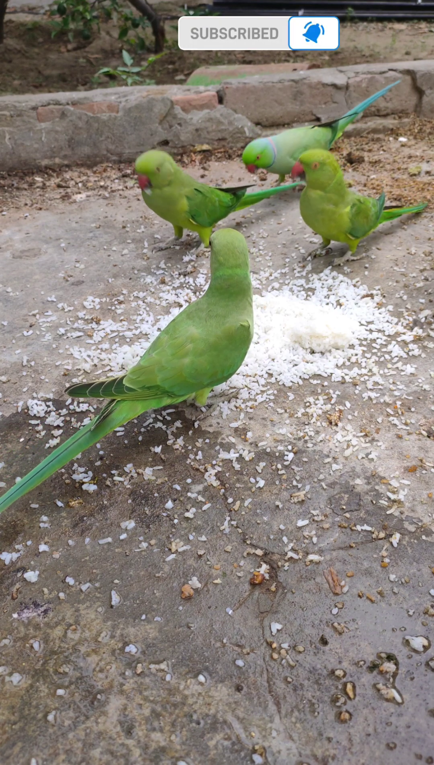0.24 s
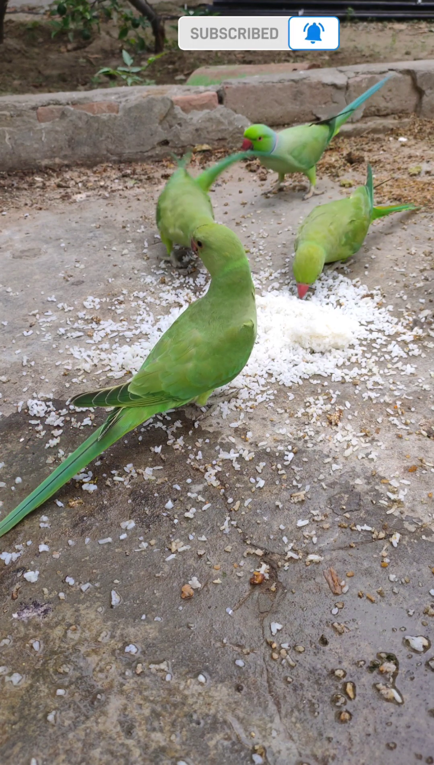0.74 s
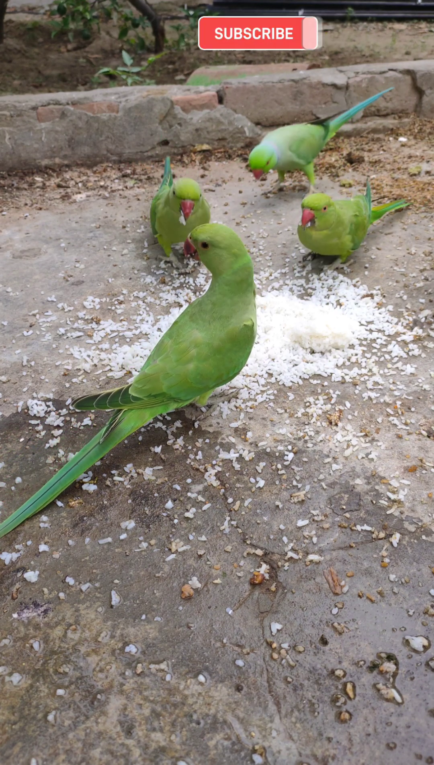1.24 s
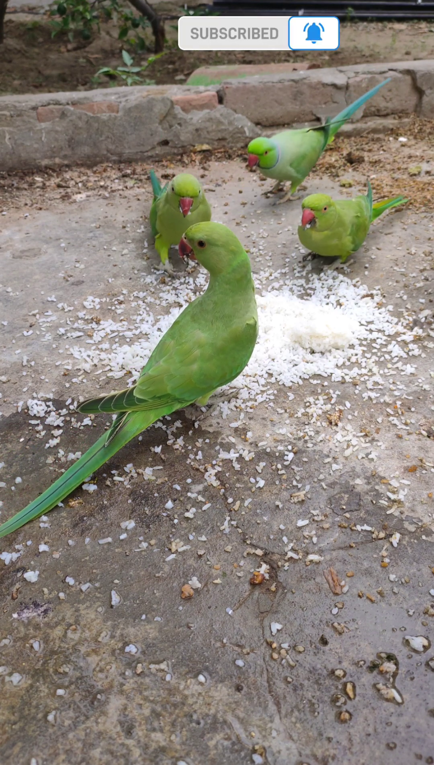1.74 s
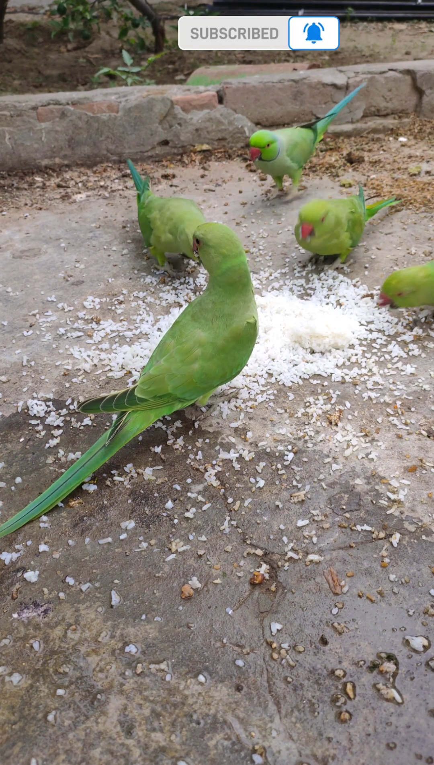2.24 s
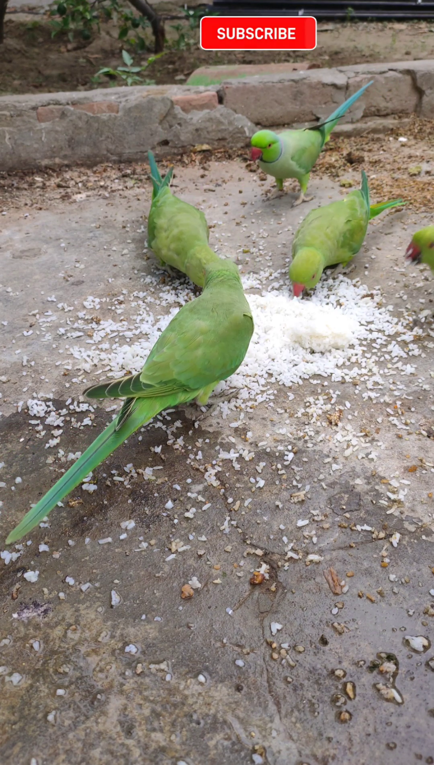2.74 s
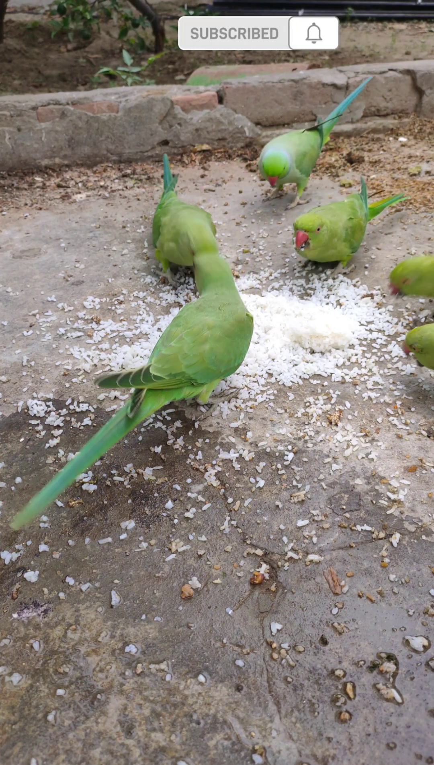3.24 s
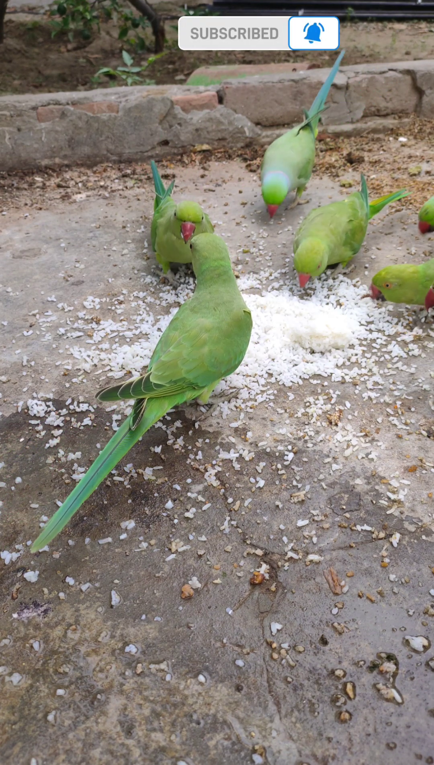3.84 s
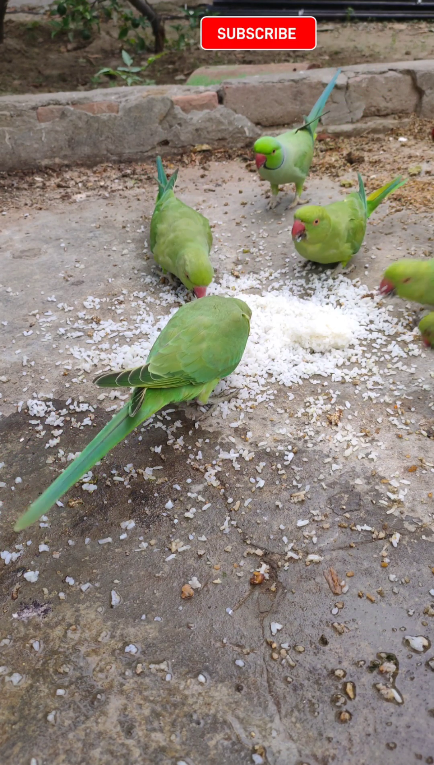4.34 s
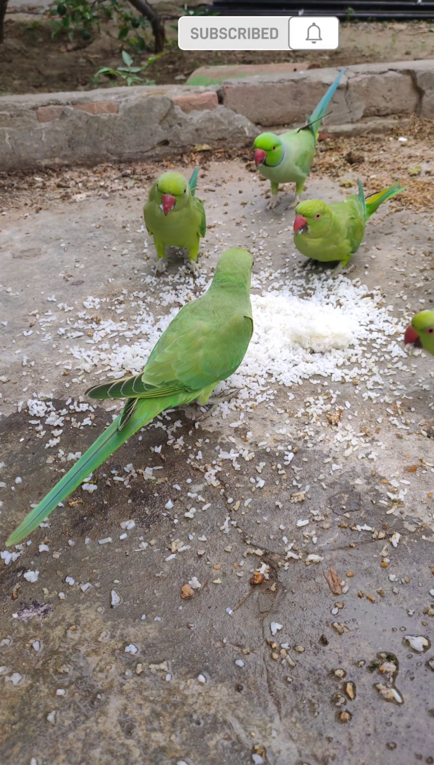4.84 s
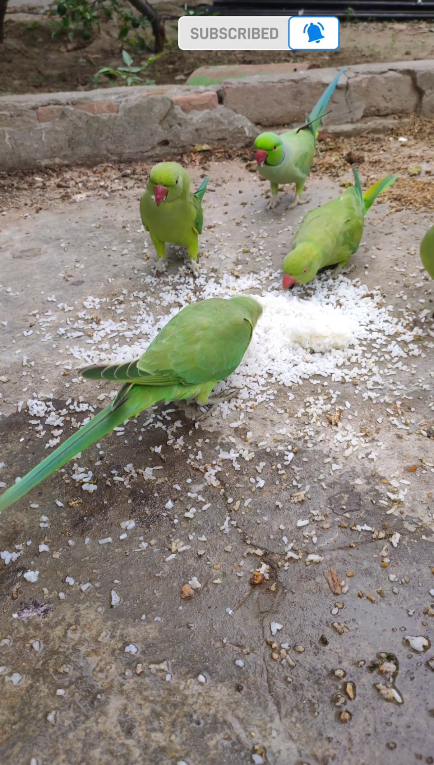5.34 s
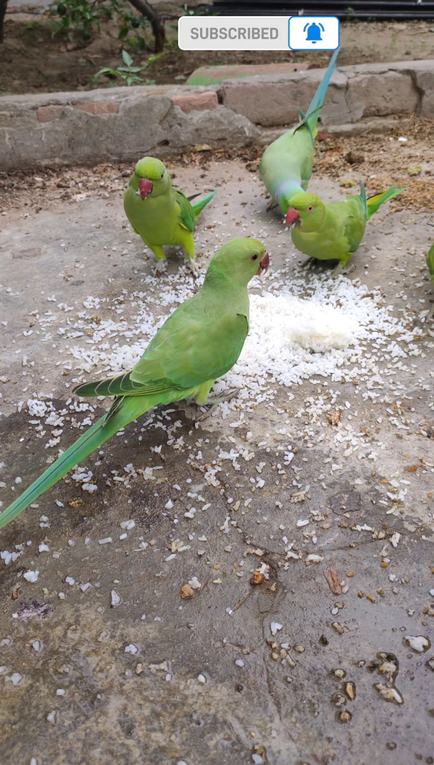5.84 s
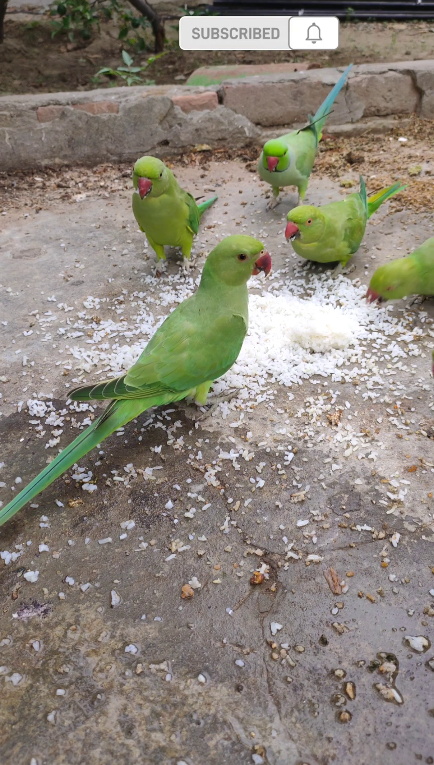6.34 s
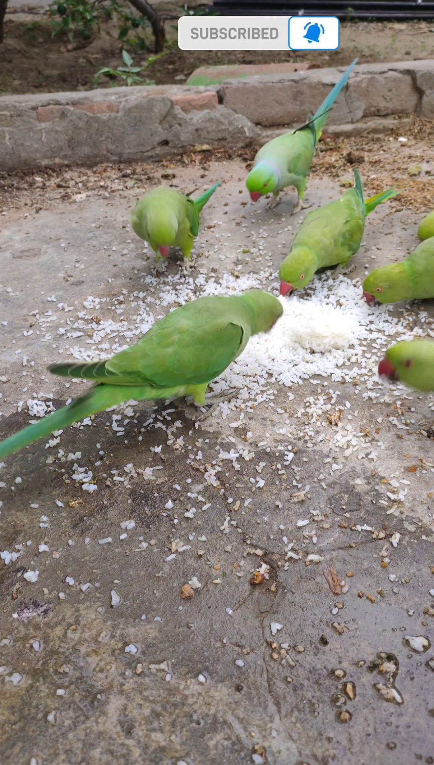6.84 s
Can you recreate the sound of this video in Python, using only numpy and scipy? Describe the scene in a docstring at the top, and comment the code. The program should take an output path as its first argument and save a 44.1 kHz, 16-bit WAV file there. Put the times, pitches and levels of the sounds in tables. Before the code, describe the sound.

A sharp parakeet shriek bursts close by, then screeches, clear plunging whistles and nasal yelps echo around a quiet walled yard with faint grain rustle.

```python
"""A walled yard where parakeets feed on the ground: one shrieks close by, others screech, yelp, whistle, whine
and croak around it. Each call is a sum of harmonics, half-harmonics and hiss shaped by a throat spectrum.
Faint twitters come from farther off; beaks tick, grain rustles and wings flap, as shaped noise and short
falling tones, and a soft bright hiss swells unevenly. The walls return the calls as echoes and a diffuse tail,
over a low outdoor wash, two distant hums and air that buffets the microphone."""
import sys
import numpy as np
from scipy import signal
from scipy.fft import rfft, irfft, next_fast_len
from scipy.io import wavfile
from scipy.ndimage import uniform_filter1d

SR = 44100
rng = np.random.default_rng(int(sys.argv[2]) if len(sys.argv) > 2 else 0)


def waveform_to_disk(signal):
    """Save audio, clipped to [-1, 1], as 16-bit WAV at the path in sys.argv[1]."""
    frames = np.transpose(np.atleast_2d(signal))
    scaled = np.clip(frames, -1, 1) * 32767
    samples = np.round(scaled).astype(np.int16)
    wavfile.write(sys.argv[1], SR, samples)


N = 312228
TIME = np.arange(N) / SR
EDGE_HZ = 15400  # upper band limit

# Course of the sharp shriek next to the microphone: [t/s, f/Hz, level/dB]
SHRIEK_COURSE = [(0, 2164, -17.5), (.008, 2198, -20), (.012, 2515, -26.5), (.018, 2665, -30.5),
                 (.023, 2323, -25), (.027, 1745, -28.5), (.031, 1426, -29.5), (.036, 1328, -36.5),
                 (.043, 1250, -48.5)]
# Harsh arched screeches: [start t/s, length t/s, top f/Hz, share of length spent rising, level/dB]
SCREECH_NOTES = [(0.27, 0.082, 2497, 0.29, -53), (0.456, .106, 2430, .27, -46),
                 (0.664, 0.1, 2278, 0.16, -43.5), (2.727, 0.17, 2090, 0.19, -66),
                 (2.957, 0.12, 2310, 0.2, -64), (3.202, .115, 2370, .27, -66.5),
                 (3.44, 0.13, 2550, .25, -65.5)]
# Nearly pure whistles that end in a plunge:
# [start t/s, hold t/s, plunge t/s, opening f/Hz, settled f/Hz, crest f/Hz, level/dB, swell/dB]
WHISTLE_NOTES = [ (0.555, 0.071, 0.043, 2097, 2137, 2247, -38.5, 12.5),
                 (2.334, 0.12, 0.058, 2393, 2426, 2426, -34.5, 19.5),
                 (2.809, .069, .052, 2095, 2180, 2364, -39.5, 17.5),
                 (3.062, .069, 0.023, 2533, 2359, 2675, -35, 15),
                 (3.269, 0.068, 0.047, 2640, 2476, 2486, -33, 19),
                 (3.475, 0.08, 0.043, 2616, 2442, 2491, -31.5, 20.5),
                 (3.681, .053, .05, 2850, 2690, 2584, -30, 17.5),
                 (3.853, 0.056, 0.058, 3187, 2820, 2743, -30.5, 19.5),
                 (6.703, .047, .012, 2412, 2540, 2665, -33, 9.5)]
# Whines with more overtones:
# [start t/s, length t/s, opening f/Hz, turning f/Hz, closing f/Hz, share before the turn, level/dB, swell/dB]
WHINE_NOTES = [(5.25, .165, 1311, 1231, 1280, 0.647, -50.5, 7.5),
               (6.484, .117, 2290, 2256, 2639, 0.142, -34, 11.5)]
# Nasal yelps, bending through a turning pitch: columns as for the whines
YELP_NOTES = [ (.456, 0.014, 2260, 2110, 2180, 0.6, -44.5, 14),
              (2.004, 0.063, 2008, 1790, 1990, 0.63, -39.5, 6.2),
              (2.167, 0.11, 1943, 1924, 2460, 0.3, -37.5, 1.6),
              (2.632, 0.067, 2150, 1871, 2224, .42, -41.5, 2),
              (5.662, 0.073, 2198, 2018, 2106, 0.45, -42.5, 3.4),
              (5.829, .062, 2050, 1985, 2125, 0.514, -40.5, 5.6),
              (6.297, .077, 1668, 1768, 1828, 0.46, -39, 8.4),
              (6.686, .011, 2260, 2178, 2280, 0.44, -48.5, 3.6),
              (6.917, 0.023, 2580, 2070, 2060, .65, -43.5, 5.9),
              (6.954, 0.048, 2054, 2008, 2498, 0.29, -39.5, 10.4)]
# Low falling chucks of another bird: [start t/s, length t/s, closing f/Hz, level/dB]
CHUCK_NOTES = [(1.613, .042, 526, -49.5), (1.813, .043, 519.7, -49), (2.006, 0.027, 501, -51.5)]
# Rasping croaks, alone or where a call breaks off: [start t/s, length t/s, closing f/Hz, level/dB]
CROAK_NOTES = [(5.99, .112, 1436, -56.5), (6.152, .076, 1420, -57.5), (6.598, 0.034, 1984, -62.5),
               (6.754, 0.041, 1438, -59.5)]
# Course of a hoarse rising squawk: [t/s, f/Hz, level/dB]
SQUAWK_COURSE = [(5.405, 1324, -59), (5.44, 1660, -45), (5.48, 1858, -49), (5.515, 2050, -44.5),
                 (5.535, 2430, -59)]
# Soft slides: faint twitters and the rising lead-in of a screech:
# [start t/s, length t/s, opening f/Hz, closing f/Hz, level/dB]
SOFT_SLIDES = [ (0.212, 0.057, 2235, 3730, -54), (0.972, 0.031, 2490, 2434, -68),
               (1.296, .125, 3360, 2400, -69), (1.618, 0.036, 2646, 2390, -61),
               (1.825, 0.043, 2820, 2360, -57), (3.876, 0.13, 1130, 1500, -60.5),
               (4.12, 0.11, 2543, 2680, -66), (4.421, .135, 2316, 2750, -67),
               (4.755, 0.17, 2180, 2790, -66), (5.02, 0.056, 2000, 2020, -75),
               (5.107, .24, 2848, 3057, -70.5), (6.45, 0.032, 2880, 2484, -46.5)]

# Throat spectra, one for each kind of call: [f/Hz, relative level/dB]
SHRIEK_SPECTRUM = [(1300, -17), (2400, -13.5), (4400, 3), (5300, -10.5), (6600, -20.5), (8800, -10),
                   (11000, -12.5), (13000, -13), (15500, -31.5)]
SCREECH_SPECTRUM = [(1500, -36), (2300, 4), (3400, 11), (4600, 2.5), (6000, 10.5), (7500, 2), (9300, 0.5),
                    (11000, -29), (15000, -27)]
WHISTLE_SPECTRUM = [(1100, 0), (2700, 0), (3500, -16), (5000, -22), (7500, -30), (10000, -42), (15000, -50)]
WHINE_SPECTRUM = [(1200, 25.5), (2400, 6.5), (3500, 3), (4700, -15), (7200, -34.5), (9500, -42),
                  (15000, -43)]  # shared by the soft slides
YELP_SPECTRUM = [(1700, -3.5), (1930, -4), (2200, 12.5), (2900, -1), (3600, 3), (3900, -1), (4200, -4),
                 (5700, -21), (7600, -27), (10000, -33.5), (15000, -42)]
SQUAWK_SPECTRUM = [(1200, -7), (2200, 2.5), (2800, -20), (3500, -6.5), (4300, -57), (9000, -36),
                   (15000, -36)]
CHUCK_SPECTRUM = [(480, 6.5), (700, 2.5), (1200, 6), (1700, -4.5), (2500, -37.5), (3300, -21), (5000, -23),
                  (9000, -30), (15000, -27)]
CROAK_SPECTRUM = [(1100, -1), (1500, -1.5), (2300, -3), (3200, -19), (6000, -34), (15000, -29)]

# Beak ticks: [t/s, peak level/dB]
BEAK_TICKS = [(0.148, -46.5), (0.426, -54), (0.443, -45.5), (1.394, -54), (1.45, -42.5), (3.508, -41.5),
              (3.523, -36)]
# Soft wing beats and bumps: [t/s, level/dB, f/Hz, half-length t/s, left-right difference/dB]
WING_PUFFS = [(.008, -37.5, 207, 0.017, 17), (.014, -47, 605, 0.017, 6.5), (0.03, -39.5, 260, .02, 13),
              (0.235, -37, 120, .017, 6), (.26, -47, 255, .014, 4), (0.312, -39, 90.5, .021, -9),
              (.429, -51, 1130, 0.0067, 5), (5.448, -55, 367, 0.035, 5), (5.554, -51.5, 278, 0.035, 4),
              (5.631, -51.5, 412, 0.027, 3), (5.732, -54, 326, 0.032, 3), (5.822, -55, 333, 0.032, 2),
              (5.908, -52, 468, 0.017, 4), (6.125, -43.5, 145, .02, -17), (6.246, -43.5, 115, 0.0427, 15),
              (6.319, -29.5, 134, 0.0093, -30), (6.545, -42, 130, .025, 24), (6.631, -41, 84.5, 0.037, -15)]
# Scuffles in the grain: [start t/s, length t/s, level/dB]
GRAIN_SCUFFLES = [(0, 0.022, -49.5), (2.428, 0.14, -54), (2.595, 0.24, -62.5), (2.965, 0.14, -65.5),
                  (3.206, 0.11, -66), (3.478, 0.087, -69), (5.347, 0.55, -65.5)]
# Soft bright hiss, partly around the whistles: [start t/s, length t/s, level/dB]
BRIGHT_HISS = [(3.31, 0.053, -75), (3.49, 0.069, -65), (3.7, .06, -72.5), (3.873, 0.076, -73),
               (4.49, 0.71, -81.5), (5.178, 0.65, -77)]
# Gusts on the microphone: [peak t/s, width t/s, level/dB]
AIR_GUSTS = [(.01, 0.063, -46.5), (.27, 0.18, -50), (1.1, .3, -71.5), (3.9, 0.36, -72), (3.15, 0.29, -62.5),
             (4.6, 0.56, -66.5), (5.5, 0.597, -60.5), (6.25, 0.26, -47), (6.599, 0.089, -60),
             (6.95, 0.54, -56.5)]
# Two distant hums: [start t/s, fade-in t/s, f/Hz, level/dB]
DISTANT_HUMS = [(4.4, 0.3, 73.27, -60.5), (6.54, .06, 304.4, -66.5)]

# Noise spectra of ticks and bright hiss, rustling grain, buffeting air and outdoor wash:
# [f/Hz, relative level/dB]
BRIGHT_SPECTRUM = [(500, -25), (3000, -12), (8000, -6.5), (13000, 2.5), (15500, -6)]
RUSTLE_SPECTRUM = [(800, -5.5), (2000, 4.5), (4000, 3), (5500, -2), (7400, 1), (9500, -4), (11500, -16),
                   (15000, -23.5)]
BUFFET_SPECTRUM = [(20, -20.5), (45, -4.5), (70, 8.5), (110, 0), (160, -7.5), (230, -16), (350, -23.5),
                   (700, -41), (2000, -63)]
WASH_SPECTRUM = [(15, -22), (40, -2), (75, 0.05), (125, -5), (200, -9), (270, -15), (400, -15), (560, -13),
                 (800, -16), (2400, -18), (4000, -27), (7000, -28), (10000, -32), (15000, -34)]
# Left-right coherence of the noises: [f/Hz, coherence 0-1]
COHERENCE = [(60, .4), (200, .4), (550, .65), (2000, .55), (5000, .25), (15000, .2)]

# Wall echoes: [left delay t/s, right delay t/s, level/dB before each call's own wall gain]
WALL_ECHOES = [(0.011, 0.0115, -3.5), (0.021, 0.011, -8.5), (0.045, 0.0385, -11), (0.054, 0.032, -18.5),
               (.078, .08, -24.5)]
# Decay of the diffuse tail: [f/Hz, time to fall 60 dB t/s]
TAIL_DECAY = [(300, 0.45), (1500, 0.7), (2600, 0.37), (5000, 0.56), (9000, 0.39), (15000, 0.87)]
# Far walls that return the shriek: [delay t/s, level/dB]
FAR_WALL_ECHOES = [(.052, -37), (0.065, -44), (.075, -36), (.087, -31), (.108, -32)]
# Shading between the microphones by the recorder's body, for a bird so close: [f/Hz, left-right difference/dB]
NEAR_SHADING = [(1500, 7), (2500, 10), (4400, 16), (6500, 4.5), (8800, -7), (10700, -13), (13000, 13)]

FAR_WALL_HZ = 5600  # the far walls give back little above this
WASH_DB = -62.5
SCREECH_OPENS, SCREECH_CLOSES = 0.62, 0.66  # pitch at either end, as a share of the top
WHISTLE_SETTLES, WHISTLE_CRESTS = 0.365, 0.822  # shares of the hold
KNEE, PLUNGE_TO = 0.98, 0.48  # pitch at the start and end of the plunge, as a share of the crest pitch
BREAK_HZ_SHARE, BREAK_DB = 0.044, 4.5  # how far pitch and level shake as a whistle collapses
STRAIN_HZ_SHARE, STRAIN_DB = 0.034, 3.5  # the same at the strained end of a yelp or whine
SCUFFLE_ATTACK_S, SCUFFLE_RELEASE_S = 0.016, 0.051
FEEDING_FROM_S, FEEDING_TO_S = 1.2, 6.8
FEEDING_DB, FIDGET_DB = -73, -3  # level of the steady stir and its unevenness


def gain_of(db):
    """Decibel law: level to amplitude ratio."""
    return 10 ** (np.asarray(db) / 20)


def evened(x):
    """Normalization: scales to rms 1."""
    return x / np.sqrt(np.mean(x ** 2) + 1e-20)


def read(points, hz):
    """Interpolation of a spectrum on a log-frequency axis."""
    f, value = np.transpose(points)
    return np.interp(np.log(hz + 1), np.log(f + 1), value)


def add(mix, s, sound):
    """Superposition: adds a sound to the mix at time s."""
    part = mix[..., max(round(s * SR), 0):][..., :sound.shape[-1]]
    part += sound[..., :part.shape[-1]]


def wander(n, hz):
    """Low-pass random drift of rms near 1, mostly slower than about hz."""
    size = next_fast_len(n + 2048)
    f = np.fft.rfftfreq(size, 1 / SR)
    spectrum = rfft(rng.standard_normal(size)) * np.exp(-(f / hz) ** 2)
    return evened(irfft(spectrum, size))[:n]


def shake(u):
    """Quick random unsteadiness of rms 1 over the course of a call."""
    return evened(uniform_filter1d(rng.standard_normal(len(u)), size=3))


def progress(count=60):
    """Normalized time: the course of a call from 0 to 1."""
    return np.arange(count) / (count - 1)


def arc(u, turn, opening, middle, closing, curve):
    """Power-law contour: eases from opening to middle at the turn, then away to closing; u runs 0-1."""
    before = np.clip(1 - u / turn, 0, 1)
    after = np.clip((u - turn) / (1 - turn), 0, 1)
    return middle + (opening - middle) * before ** curve + (closing - middle) * after ** curve


def burst(start, length, attack_s, release_s):
    """Envelope: linear attack, hold and exponential release."""
    attack = np.clip((TIME - start) / attack_s, 0, 1)
    return attack * np.exp(-np.maximum(TIME - start - length, 0) / release_s)


def sides(balance_db):
    """Intensity stereophony: left and right gains for a level difference, at constant power."""
    return evened(gain_of(np.array([[balance_db], [-balance_db]]) / 2))


def delayed_right(spectrum, lag_s):
    """Phase shift theorem: two copies of a spectrum, the right one later by lag_s."""
    hz = np.fft.rfftfreq(N, 1 / SR)
    return spectrum * np.exp(-2j * np.pi * np.outer([0, lag_s], hz))


def aside(x, balance_db, lag_s):
    """Level and time difference: an off-centre source differs in loudness and arrival between the sides."""
    return sides(balance_db) * irfft(delayed_right(rfft(x), lag_s), N)


def noise(spectrum, patchy_db):
    """Partial coherence: stereo noise of rms 1 with a given spectrum and drifting patches."""
    frames, hz = N // 256 + 6, np.fft.rfftfreq(1024, 1 / SR)
    a, b, c, d, patches = rng.standard_normal((5, frames, len(hz))).transpose(0, 2, 1)
    patches = uniform_filter1d(patches, size=12, axis=0)
    patches = evened(uniform_filter1d(patches, size=12, axis=1))
    same = read(COHERENCE, hz)[:, None]
    left, independent = a + 1j * b, c + 1j * d
    right = same * left + np.sqrt(1 - same ** 2) * independent
    z = np.array([left, right]) * gain_of(read(spectrum, hz)[:, None] + patchy_db * patches)
    return evened(signal.istft(z, nperseg=1024, noverlap=768)[1][:, :N])


def yard(x, walls_db, tail_db):
    """Reverberation: a few wall echoes, and a diffuse tail in which each band dies at its own speed."""
    t = np.arange(SR) / SR
    taps = rng.standard_normal((2, SR)) * (rng.random((2, SR)) < 0.08)  # sparse reflections
    taps *= np.clip((t - 0.006) / 0.013, 0, 1)
    hz, at, z = signal.stft(taps, SR, nperseg=256)
    decay = gain_of(-60 * at / read(TAIL_DECAY, hz)[:, None])
    response = signal.istft(z * decay, SR, nperseg=256)[1]
    response *= gain_of(tail_db) / np.linalg.norm(response, axis=1, keepdims=True)
    for left, right, db in WALL_ECHOES:
        response[[0, 1], [round(left * SR), round(right * SR)]] += gain_of(db + walls_db)
    return signal.fftconvolve(x[None], response, axes=1)[:, :N]


def syrinx(calls, throat, jitter, jitter_hz, flutter, half_db, hiss_db, overtone_db=0):
    """Source and filter: a jittering membrane's harmonics, half-harmonics from uneven cycles and air hiss
    pass the throat; each call is rows [t/s, f/Hz, level/dB]."""
    out = np.zeros(N)
    for rows in calls:
        s, pitch, level = np.transpose(rows)
        t = np.arange(s.min(), s.max() + 0.0051, 1 / SR)
        hz = uniform_filter1d(np.interp(t, s, pitch), size=300, mode="nearest")
        turns = np.cumsum(hz * (1 + jitter * wander(len(t), jitter_hz))) / SR + rng.random()
        # multiples of the pitch in steps of a half, starting at 1
        multiple = np.arange(2, min(2 * EDGE_HZ // hz.min(), 30))[:, None] / 2
        partial_hz = multiple * hz
        height = gain_of(read(throat, partial_hz) + half_db * (multiple % 1 > 0))
        height = height * (partial_hz < SR / 2)
        height = height * gain_of(overtone_db * (multiple > 1))  # a gently driven membrane is nearly a sine
        # overtones sound less steadily the higher they lie, up to a limit
        flicker = evened(uniform_filter1d(rng.standard_normal(height.shape), size=350))
        height = height * gain_of(np.minimum(multiple - 1, 3) * 1.42 * flicker)
        tone = (height * np.sin(2 * np.pi * multiple * turns)).sum(0)
        tone /= np.sqrt((height ** 2).sum(0) / 2)
        f = np.fft.rfftfreq(len(t), 1 / SR)
        hiss_gain = gain_of(read(throat, f)) * (f > 0.7 * hz.min())
        hiss = evened(irfft(rfft(rng.standard_normal(len(t))) * hiss_gain, len(t)))
        edges = np.clip(np.minimum(t - t[0], t[-1] - t) / 0.0015, 0, 1)
        effort = edges * gain_of(np.interp(t, s, level)) * np.exp(flutter * wander(len(t), jitter_hz))
        add(out, t[0], (tone + gain_of(hiss_db) * hiss) * effort)
    return out


def bending(rows, curve, crest, fade_db):
    """Pitch glide: notes bend through one turning pitch, swell to a crest and roughen at the end."""
    u, calls = progress(), []
    strain = u ** 3
    for start, length, opening_hz, turn_hz, closing_hz, turn, db, swell_db in rows:
        hz = arc(u, turn, opening_hz, turn_hz, closing_hz, curve)
        hz = hz * (1 + STRAIN_HZ_SHARE * strain * shake(u))
        level = db + arc(u, crest, -swell_db, 0, -fade_db, curve=3.2) + STRAIN_DB * strain * shake(u)
        calls.append(np.c_[start + length * u, hz, level])
    return calls


def dropping(rows, drop, curve, crest, swell_db, fade_db):
    """Falling glide: notes start high by the share drop and sink to their closing pitch."""
    u, calls = progress(), []
    for start, length, closing_hz, db in rows:
        hz = closing_hz * (1 + drop * (1 - u) ** curve)
        level = db + arc(u, crest, -swell_db, 0, -fade_db, curve=2)
        calls.append(np.c_[start + length * u, hz, level])
    return calls


def shriek():
    """Strongly driven membrane: a plunging pitch with wide jitter and much hiss."""
    return syrinx([SHRIEK_COURSE], SHRIEK_SPECTRUM, jitter=0.016, jitter_hz=1200, flutter=0.2,
                  half_db=-20, hiss_db=-9)


def close_by(x, lag_s):
    """Near-field shading: levels differ between the microphones by frequency, and the right one hears later."""
    hz = np.fft.rfftfreq(N, 1 / SR)
    shading = gain_of(np.outer([0.5, -0.5], read(NEAR_SHADING, hz)))
    shading /= np.sqrt((shading ** 2).mean(0))
    return irfft(delayed_right(rfft(x), lag_s) * shading, N)


def far_echoes(x):
    """Absorbing reflection: late, dull returns from the far side of the yard."""
    dull = signal.sosfilt(signal.butter(3, FAR_WALL_HZ, fs=SR, output="sos"), x)
    out = np.zeros(N)
    for delay, db in FAR_WALL_ECHOES:
        add(out, delay, gain_of(db) * dull)
    return out


def crackle(per_s, spread_db):
    """Random impulses: single grains shift under feet as sparse tiny clicks, a few of them larger."""
    clicks = rng.standard_normal((2, N)) * (rng.random(N) < per_s / SR)
    clicks *= gain_of(spread_db * np.minimum(rng.exponential(1, N), 3))
    t = np.arange(200) / SR
    grain = rng.standard_normal((2, len(t))) * np.exp(-t / 0.001)
    clicks = signal.oaconvolve(clicks, grain, axes=1)[:, :N]
    colour = gain_of(read(RUSTLE_SPECTRUM, np.fft.rfftfreq(N, 1 / SR)))
    return evened(irfft(rfft(clicks) * colour, N))


def footwork():
    """Power addition: restless feeding and a few scuffles set how hard the grain is stirred."""
    feeding = gain_of(FEEDING_DB + FIDGET_DB * wander(N, 42))
    feeding *= burst(FEEDING_FROM_S, FEEDING_TO_S - FEEDING_FROM_S, attack_s=0.2, release_s=0.15)
    power = feeding ** 2
    for s, length, db in GRAIN_SCUFFLES:
        power += (gain_of(db) * burst(s, length, SCUFFLE_ATTACK_S, SCUFFLE_RELEASE_S)) ** 2
    return np.sqrt(power)


def rustle():
    """Amplitude modulation: footwork drives a patchy noise and the crackle of grains."""
    stirring = noise(RUSTLE_SPECTRUM, patchy_db=5.5) + gain_of(-9) * crackle(per_s=300, spread_db=1.0)
    return stirring * footwork()


def wash():
    """Stationary noise: the low outdoor background."""
    return noise(WASH_SPECTRUM, patchy_db=2.0) * gain_of(WASH_DB)


def buffeting():
    """Amplitude modulation: air noise on the microphone, each gust swelling and dying as a bell."""
    gusts = sum(gain_of(db) * np.exp(-((TIME - s) / width) ** 2) for s, width, db in AIR_GUSTS)
    return noise(BUFFET_SPECTRUM, patchy_db=1.5) * gusts


def puffs():
    """Air displacement: each beat or bump pushes out a short, falling and unsteady oscillation."""
    out = np.zeros((2, N))
    for s, db, hz, half_length, balance_db in WING_PUFFS:
        t = np.arange(-half_length, half_length, 1 / SR)
        turns = np.cumsum(hz * (1 - 0.3 * t / half_length + 0.28 * wander(len(t), 190))) / SR
        puff = np.sqrt(2) * np.hanning(len(t)) ** 2 * np.cos(2 * np.pi * turns)
        add(out, s - half_length, sides(balance_db) * gain_of(db) * puff)
    return out


def ticks():
    """Fracture impulse: beaks snap grains with a short bright crack and a faint, slower tail of noise."""
    t, out = np.arange(2048) / SR, np.zeros((2, N))
    colour = gain_of(read(BRIGHT_SPECTRUM, np.fft.rfftfreq(len(t), 1 / SR)))
    shape = np.minimum(t / 0.002, 1) * (np.exp(-t / 0.003) + 0.07 * np.exp(-t / 0.025))
    for s, db in BEAK_TICKS:
        crack = irfft(rfft(rng.standard_normal((2, len(t)))) * colour) * shape
        add(out, s, gain_of(db) * crack / abs(crack).max())
    return out


def soft_slides(swell_db=10, fade_db=7):
    """Decelerating glide: twitters and a screech's lead-in slide and level off, fading in and out."""
    u, calls = progress(), []
    for start, length, opening_hz, closing_hz, db in SOFT_SLIDES:
        hz = closing_hz + (opening_hz - closing_hz) * (1 - u) ** 1.5
        level = db + arc(u, 0.58, -swell_db, 0, -fade_db, curve=1.6)
        calls.append(np.c_[start + length * u, hz, level])
    return syrinx(calls, WHINE_SPECTRUM, jitter=0.02, jitter_hz=300, flutter=0.3, half_db=-25, hiss_db=-21)


def screeches():
    """Rising effort: the pitch leaps up and sinks slowly while the level grows until late in the call."""
    u, calls = progress(), []
    for start, length, top_hz, rise, db in SCREECH_NOTES:
        hz = top_hz * arc(u, rise, SCREECH_OPENS, 1, SCREECH_CLOSES, curve=0.95)
        level = db + arc(u, turn=0.78, opening=-8, middle=0, closing=-10, curve=1.4)
        calls.append(np.c_[start + length * u, hz, level])
    return syrinx(calls, SCREECH_SPECTRUM, jitter=0.013, jitter_hz=550, flutter=0.46, half_db=-24, hiss_db=-18)


def yelps():
    """Bending membrane tone: nasal notes with faint half-harmonics."""
    calls = bending(YELP_NOTES, curve=1.88, crest=0.85, fade_db=6)
    return syrinx(calls, YELP_SPECTRUM, jitter=0.0062, jitter_hz=340, flutter=0.02, half_db=-24.5, hiss_db=-36.5)


def whistling(start, hold, plunge, opening_hz, settled_hz, crest_hz, db, swell_db, fade_db=22):
    """Loss of drive: the note settles and swells to a crest; then pitch and level collapse and shake."""
    u = progress()
    held_hz = np.interp(u, [0, WHISTLE_SETTLES, WHISTLE_CRESTS, 1],
                        [opening_hz, settled_hz, crest_hz, KNEE * crest_hz])
    held_db = db + arc(u, WHISTLE_CRESTS, -swell_db, 0, closing=-0.81, curve=1.59)
    falling_hz = crest_hz * (PLUNGE_TO + (KNEE - PLUNGE_TO) * (1 - u) ** 1.3)
    falling_hz = falling_hz * (1 + BREAK_HZ_SHARE * np.sqrt(u) * shake(u))
    falling_db = held_db[-1] - fade_db * u ** 0.6 + BREAK_DB * np.sqrt(u) * shake(u)
    held = np.c_[start + hold * u, held_hz, held_db]
    falling = np.c_[start + hold + plunge * u, falling_hz, falling_db]
    return np.r_[held, falling]


def whistles():
    """Gently driven membrane: nearly pure tones with weak overtones."""
    calls = [whistling(*row) for row in WHISTLE_NOTES]
    return syrinx(calls, WHISTLE_SPECTRUM, jitter=0.0075, jitter_hz=246, flutter=0.045,
                  half_db=-49.5, hiss_db=-40.5, overtone_db=-13.0)


def chucks():
    """Relaxing membrane: low notes that fall steeply to their closing pitch."""
    calls = dropping(CHUCK_NOTES, drop=0.85, curve=2.3, crest=0.67, swell_db=9.5, fade_db=10.5)
    return syrinx(calls, CHUCK_SPECTRUM, jitter=0.014, jitter_hz=400, flutter=0.1, half_db=-18, hiss_db=-15)


def chatter(count, level_db, low_hz, high_hz):
    """Random succession: thin, high, nearly level notes of small birds in the distance."""
    calls = []
    for k, (when, where, loud) in enumerate(rng.random((count, 3))):
        s = 2.8 + (k + when) * 2.8 / count  # spread over 2.8 s, from 2.8 s on
        hz = low_hz + where * (high_hz - low_hz)
        db = level_db + 6 * (loud - 0.5)
        calls.append([(s, hz * 0.97, db - 9), (s + 0.06, hz, db), (s + 0.14, hz * 0.97, db - 9)])
    throat = [(8500, 9), (12000, -28)]  # [f/Hz, relative level/dB]
    return syrinx(calls, throat, jitter=0.018, jitter_hz=500, flutter=0.18, half_db=-41.5, hiss_db=-44)


def hisses():
    """Amplitude modulation: uneven, bright swells of hiss."""
    swell = sum(gain_of(db) * burst(s, length, attack_s=0.012, release_s=0.045)
                for s, length, db in BRIGHT_HISS)
    return noise(BRIGHT_SPECTRUM, patchy_db=3) * swell * gain_of(3.5 * wander(N, 60))


def hums():
    """Frequency modulation: faraway hums fade in and waver a little."""
    out = np.zeros(N)
    for start, fade_s, hz, db in DISTANT_HUMS:
        turns = np.cumsum(hz + 7 * wander(N, 12)) / SR
        fade = np.clip((TIME - start) / fade_s, 0, 1)
        out += np.sqrt(2) * gain_of(db) * fade * np.sin(2 * np.pi * turns)
    return out


def whines():
    """Bending membrane tone: steady notes with more overtones than the whistles."""
    calls = bending(WHINE_NOTES, curve=1.3, crest=0.78, fade_db=6)
    return syrinx(calls, WHINE_SPECTRUM, jitter=0.014, jitter_hz=250, flutter=0.042, half_db=-45, hiss_db=-47)


def squawk():
    """Irregular vibration: a hoarse rising note with wide jitter and breath."""
    return syrinx([SQUAWK_COURSE], SQUAWK_SPECTRUM, jitter=0.042, jitter_hz=398, flutter=0.4,
                  half_db=-38, hiss_db=-13)


def croaks():
    """Irregular vibration: falling notes rasp through strong half-harmonics and hiss."""
    calls = dropping(CROAK_NOTES, drop=0.21, curve=1.3, crest=0.35, swell_db=5, fade_db=6.5)
    return syrinx(calls, CROAK_SPECTRUM, jitter=0.074, jitter_hz=358, flutter=0.26, half_db=-10, hiss_db=-2.5)


def scene():
    """Direct-to-reverberant ratio: the shriek close by is dry, faint calls carry much more echo."""
    near = shriek()
    birds = close_by(near, lag_s=0.000798) + far_echoes(near) * sides(3)
    birds += yard(near, walls_db=-22.5, tail_db=-23.5) * sides(6)

    faint = soft_slides() + chatter(count=18, level_db=-79.5, low_hz=6960, high_hz=8920)
    birds += faint * sides(1.5) * gain_of(-2.0) + yard(faint, walls_db=1.5, tail_db=-4.5)

    harsh = screeches()
    birds += aside(harsh, balance_db=5, lag_s=0.00005)
    birds += yard(harsh, walls_db=-12, tail_db=-2.0) * sides(2.3)

    nasal = yelps()
    birds += aside(nasal, balance_db=-0.5, lag_s=0.00002) + yard(nasal, walls_db=-1, tail_db=-10.5)

    clear = whistles() + whines()
    birds += clear * sides(-1.9) + yard(clear, walls_db=-2.5, tail_db=-9.5)

    rough = chucks() + squawk() + croaks()
    birds += rough * sides(3.5) + yard(rough, walls_db=-1.5, tail_db=-12)

    movement = rustle() + puffs() + ticks()
    background = wash() + buffeting() + hisses() + aside(hums(), balance_db=1.0, lag_s=0.00035)
    return birds + movement + background


def record(dry):
    """Low-pass filtering: the recorder's band limit."""
    lowpass = signal.firwin(511, EDGE_HZ, window=("kaiser", 9), fs=SR)
    return signal.oaconvolve(dry, lowpass[None], "same")


dry = scene()
out = record(dry)
waveform_to_disk(out)
```